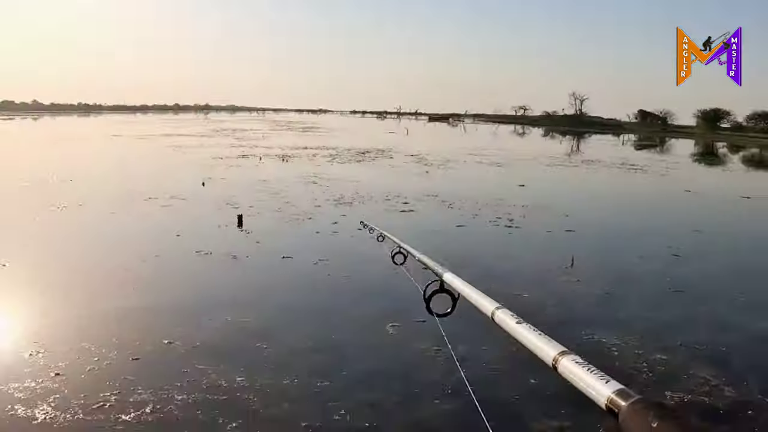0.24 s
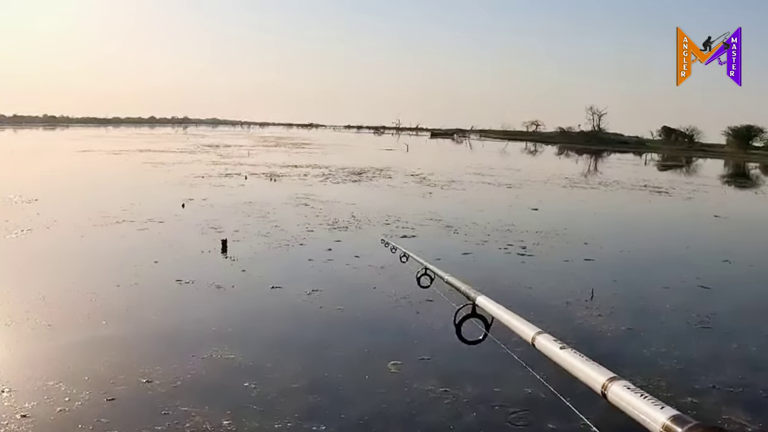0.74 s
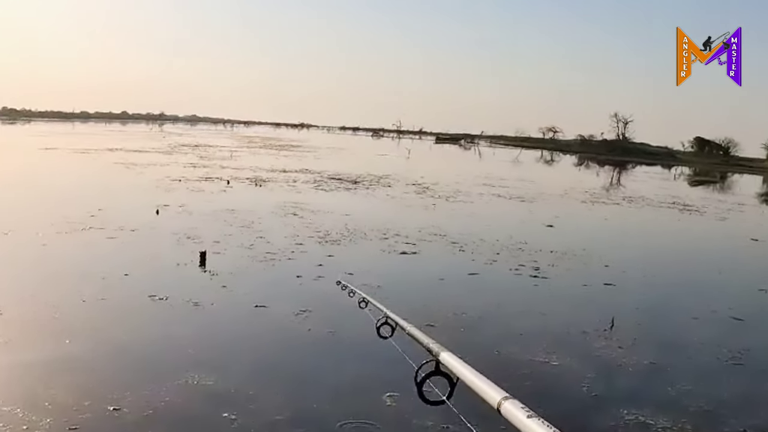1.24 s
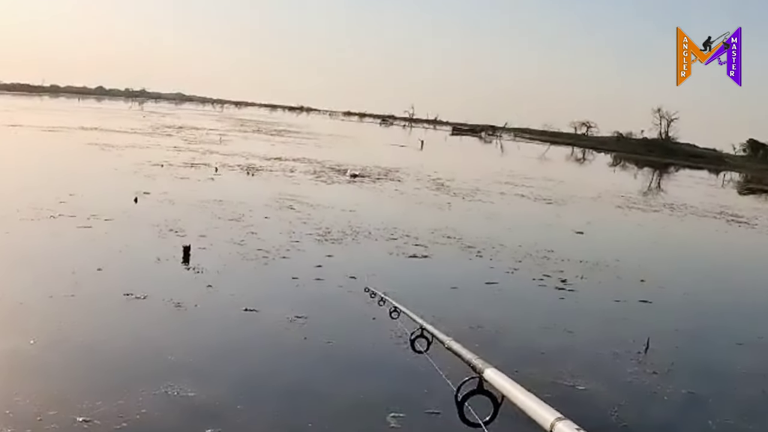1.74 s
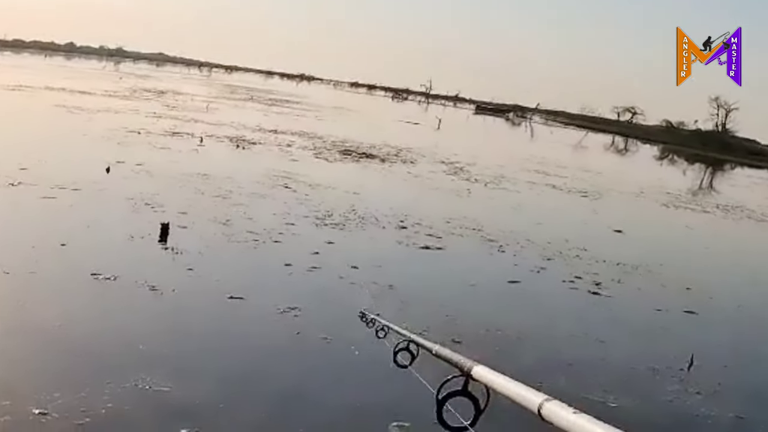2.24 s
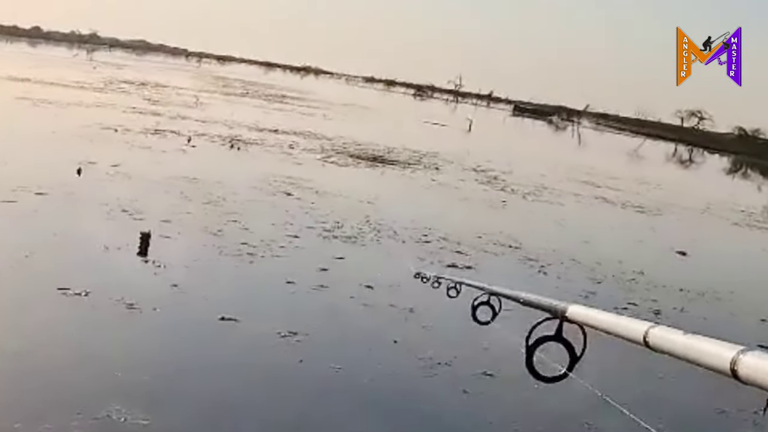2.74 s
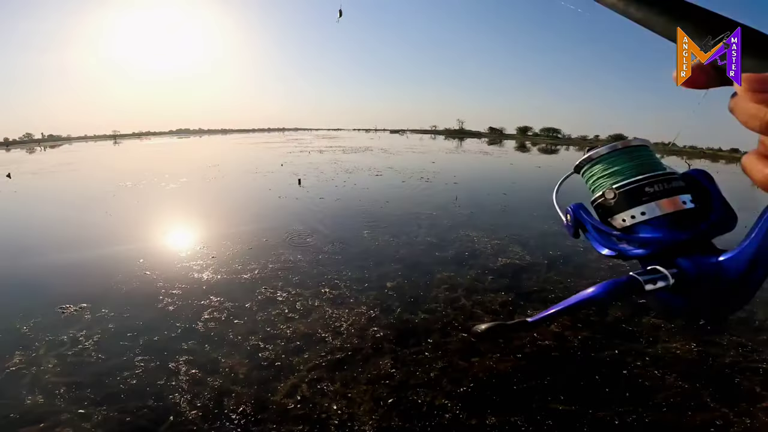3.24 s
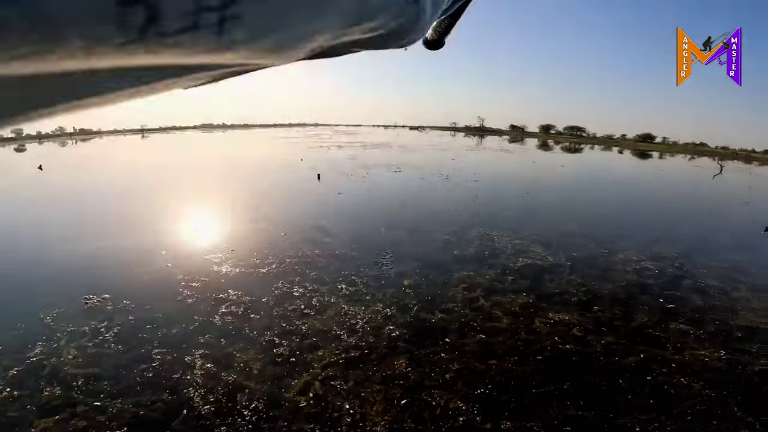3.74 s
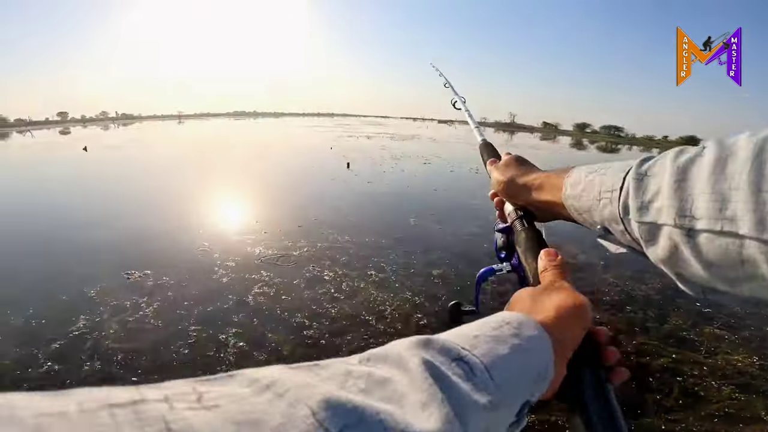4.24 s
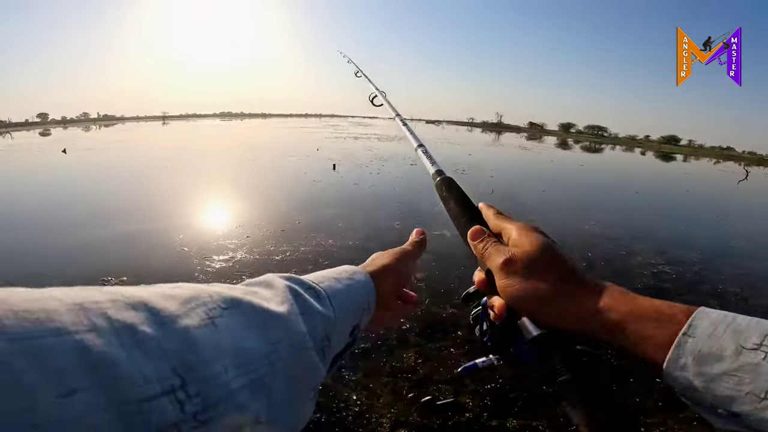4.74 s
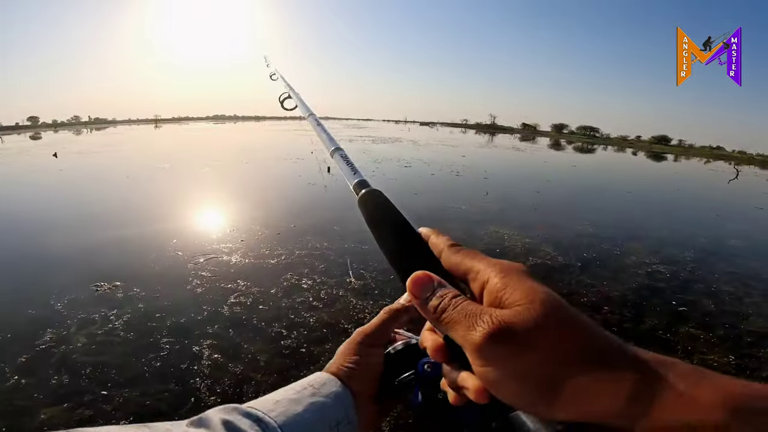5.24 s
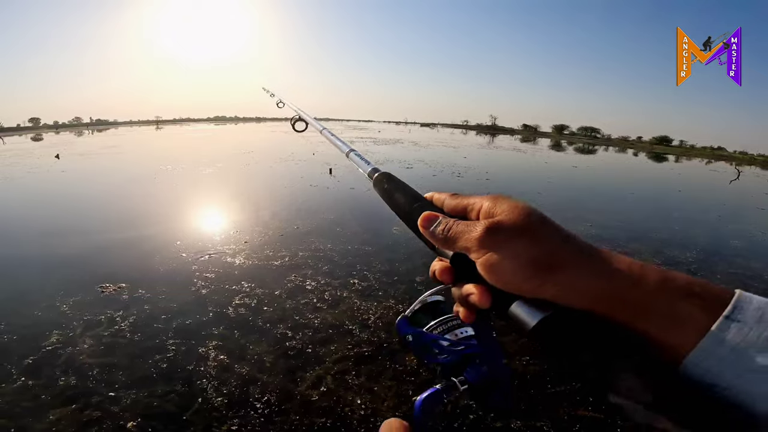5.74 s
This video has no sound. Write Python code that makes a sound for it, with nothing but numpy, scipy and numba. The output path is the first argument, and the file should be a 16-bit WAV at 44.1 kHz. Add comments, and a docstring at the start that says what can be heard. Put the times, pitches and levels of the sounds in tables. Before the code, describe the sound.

Quiet outdoor water's edge, everything dry and near. Dull, slowed winding with small knocks and ticks, a few bubbly plops and wind bumps. A crisp metal click, sleeve rustle and soft thuds prepare the cast. Then a sudden airy whirr of line with sharp guide ticks, fading to a thin hiss, ends in a dense burst of bright cracks and knocks, followed by isolated handling clicks.

```python
"""On a calm lake an angler winds a reel in: gear grains and ticks excite its body, over wind, air and birds.
From 0.3 to 3 s playback is slowed, so gear, reel, murmur and housing resonances lie lower.
The lure leaves the water in bending plops; the bail snaps open as short modes; soft knocks thump the chest mount.
The rod swings and casts: line coils slap the guides and hiss as filtered noise over the spool lip.
A hand stops the line in a burst of rubbing, knocks and ticks, and quieter handling follows."""
import sys
import numpy as np
from scipy import signal
from scipy.io import wavfile
from scipy.ndimage import uniform_filter1d
from numba import njit

SR = 44100
rng = np.random.default_rng(int(sys.argv[2]) if len(sys.argv) > 2 else 0)


def persist_wave(psi):
    """Save psi, clipped to +-1, as 16-bit WAV."""
    counts = np.round(np.clip(psi, -1, 1) * 32767).astype(np.int16)
    wavfile.write(sys.argv[1], SR, np.atleast_2d(counts).T)


N = 264688

SLOW_FROM_S, SLOW_TO_S, SLOW_SPEED = 0.3, 3.0, 0.699
TICK_T60_S, TICK_RISE_S, TICK_PAN_DB = 0.013, 0.00044, -3.5
MOUNT_LAG_S = 0.00048  # thumps and flutter travel through the mount and reach the left port later


def undb(db):
    """Amplitude ratio of a level in dB."""
    return 10 ** (np.asarray(db) / 20)


def unit(x):
    """Normalizes to a root-mean-square of 1."""
    return x / np.sqrt(np.mean(x ** 2))


def pan(left_minus_right_db):
    """Stereo gains by level difference, half of it on each side."""
    return undb(np.array([[left_minus_right_db], [-left_minus_right_db]]) / 2)


def curve(table, fade=0.044):
    """Linear interpolation of a table's columns at every sample, and a gate open while the table lasts."""
    s, *columns = np.transpose(table)
    t = np.arange(N) / SR
    gate = np.clip(np.minimum(t - s[0], s[-1] - t) / fade + .5, 0, 1)
    return [np.interp(t, s, c) for c in columns] + [gate]


def band(x, lo_hz, hi_hz, order=2):
    """Butterworth band-pass: flat between its edges."""
    return signal.sosfilt(signal.butter(order, [lo_hz, hi_hz], "bandpass", fs=SR, output="sos"), x)


def peak(x, hz, width):
    """Single resonance of a given bandwidth in Hz."""
    return signal.lfilter(*signal.iirpeak(hz, hz / width, fs=SR), x)


@njit
def svf(x, hz, width):
    """State-variable band-pass: a resonance with a moving centre, gain 1 there."""
    y, band_state, low_state = np.empty(len(x)), 0., 0.
    for i in range(len(x)):
        g, damping = np.tan(np.pi * hz[i] / SR), width / hz[i]
        v = (band_state + g * (x[i] - low_state)) / (1 + g * (g + damping))
        band_state = 2 * v - band_state
        low_state += 2 * g * v
        y[i] = damping * v
    return y


def walk(rate):
    """Slow random modulation: normal levels held 1 / rate s and smoothed twice."""
    hold = int(SR / rate)
    steps = np.repeat(rng.standard_normal(N // hold + 1), hold)
    return 1.113 * uniform_filter1d(uniform_filter1d(steps, hold), hold)[:N]


def pair(side):
    """Partly coherent noise at two microphone ports: a shared part and a share that is opposite."""
    mid, other = rng.standard_normal((2, N))
    return np.array([mid + side * other, mid - side * other])


def grit(rate, spread_db, length_s):
    """Stick-slip friction envelope: many small grains, a few large, each with a short energy tail."""
    sizes = undb(spread_db * np.minimum(rng.exponential(size=N), 4.5))
    spikes = (rng.random(N) < rate / SR) * sizes
    energy = signal.lfilter([1], [1, -np.exp(-1 / (length_s * SR))], spikes ** 2)
    return unit(np.sqrt(energy + 0.0012))


def speed_at(s):
    """Playback speed, which scales frequency in proportion."""
    return np.where((s > SLOW_FROM_S) & (s < SLOW_TO_S), SLOW_SPEED, 1.)


def ring(hz, t60, phase=0.):
    """Free decay of one mode: a sinusoid that falls 60 dB in t60 seconds."""
    t = np.arange(int((t60 + .01) * SR)) / SR
    return np.sin(2 * np.pi * hz * t + phase) * 1000 ** (-t / t60)


def rise(sound, rise_s):
    """Finite contact time: a linear onset."""
    return sound * np.minimum(np.arange(len(sound)) / (rise_s * SR), 1)


def mix(sounds):
    """Superposition of sounds of unequal length."""
    out = np.zeros(max(len(x) for x in sounds))
    for x in sounds:
        out[:len(x)] += x
    return out


def add(out, s, peak_db, sound, pan_db):
    """Superposes a short sound, scaled to its peak level before panning."""
    i = int(s * SR)
    sound = sound[:N - i] * undb(peak_db) / np.abs(sound).max()
    out[:, i:i + len(sound)] += sound * pan(pan_db)


def guide_ringing(flap, t):
    """Forced resonance: the flapping line excites guide modes whose pitch and level wander."""
    # rod guide modes before wandering: f/Hz, width/Hz, level/dB
    guide_modes = [(730, 17, -7), (934, 10, 0), (1150, 18, 6.5), (1990, 34, -4), (2510, 94, 2.5),
                   (2810, 99, 6), (3065, 47, 2), (3570, 74, 2.5), (3940, 34, -4), (4380, 39, -18)]
    total = 0
    for hz, width, db in guide_modes:
        gain = undb(db + 7 * walk(28))
        mode_hz = hz * 2 ** (.06 * walk(10))
        total = total + gain * np.array([svf(c, mode_hz, 1. * width) for c in flap])
    # the guides ring less as the line slows
    return 1.66 * np.exp(-(np.maximum(t - 4.33, 0) / 0.65) ** 2) * total


def cast():
    """Periodic excitation: coils flap on rod and guides, brush the spool lip and hum at the coil rate."""
    # line leaving the spool: t/s, rod thrum level/dB, reel body level/dB, low guide slap level/dB,
    # high guide slap level/dB, lip hiss level/dB, lip resonance f/Hz, top hiss level/dB
    line_course = [(4.11, -59, -61, -65, -69, -69, 7240, -73),
                   (4.15, -35.5, -46, -41.5, -44, -58, 7200, -64),
                   (4.2, -30, -42, -32, -30, -34.5, 7700, -46),
                   (4.25, -33, -47, -32, -31.5, -34.5, 6800, -45),
                   (4.29, -36, -36, -39, -38, -38, 6250, -49),
                   (4.36, -36, -41, -34.5, -37.5, -37, 6900, -41),
                   (4.42, -39, -45, -37, -40, -40.5, 7400, -41.5),
                   (4.49, -38.5, -50, -37.5, -36.5, -37.5, 8300, -44),
                   (4.54, -39.5, -54, -34.5, -34, -38.5, 8600, -48),
                   (4.59, -40.5, -50, -43.5, -42.5, -40, 8200, -46),
                   (4.74, -43, -44.5, -41, -39.5, -41.5, 7100, -60),
                   (4.78, -46, -52, -46, -44, -39.5, 7700, -55),
                   (4.86, -49.5, -51.5, -53, -43.5, -39, 8150, -57),
                   (4.9, -54, -46.5, -53, -45, -38.5, 7800, -60),
                   (5.03, -56, -43.5, -64, -46, -38, 7560, -58),
                   (5.1, -52, -48, -44, -47, -36.5, 6800, -55),
                   (5.23, -45.5, -42.5, -43, -39.5, -40, 5900, -49),
                   (5.3, -47, -53, -50, -40, -42, 6600, -42)]
    coil_from_s, coil_hz_start, coil_slowing_s = 4.33, 210, 0.81
    hum_db, hum_to_s, hum_fade_s = -41.5, 4.65, 0.048
    lip_focus = 2.1  # resonant share of the lip hiss
    rod_db, body_db, slap_db, high_db, lip_db, lip_hz, top_db, gate = curve(line_course)
    t = np.arange(N) / SR

    coil_hz = coil_hz_start * np.exp(-np.maximum(t - coil_from_s, 0) / coil_slowing_s)
    turn = 2 * np.pi * np.cumsum(coil_hz * (1 + 0.0299 * walk(40))) / SR
    outside_s = np.maximum(np.maximum(coil_from_s - t, t - hum_to_s), 0)
    hum = undb(hum_db) * np.exp(-outside_s / hum_fade_s)
    flap = grit(890, 1.7, 0.0046) * (1 + 0.1 * np.sin(turn)) * undb(2.0 * walk(45))

    rods = pair(0.37) * flap
    rods += guide_ringing(rods, t)
    low = unit(band(rods, 220, 1130)) * undb(rod_db)
    low += unit(peak(band(rods, 980, 1840), 1208, 97)) * undb(body_db)
    for lo_hz, hi_hz, db in [(2240, 2860, slap_db), (3140, 4900, high_db)]:
        low += unit(band(rods, lo_hz, hi_hz)) * undb(db + 1.66 * walk(22.02))
    low += np.sqrt(2) * hum * (np.sin(turn) + 0.41 * np.sin(2 * turn))
    low[0] = np.roll(low[0], 1)  # the reel is held to the right: it reaches the left port later

    brush = pair(0.22) * flap
    lip = band(brush, 4940, 9300) + lip_focus * np.array([svf(c, lip_hz, 2400.0) for c in brush])
    lip /= np.sqrt(uniform_filter1d(np.mean(lip ** 2, axis=0), int(.08 * SR)))  # even out over 80 ms
    lip *= undb(lip_db + 1.0 * walk(35))
    top = unit(band(pair(0.72) * flap, 10500, 13000)) * undb(top_db)
    return gate * (low * pan(-2.2) + lip + top * pan(2.8))


def bail():
    """Modal impact: the bail wire snaps on the rotor, bright short modes over a longer body ring."""
    # modes of the wire and reel body: f/Hz, level/dB, t60/s
    bail_modes = [(665, -14.5, .012), (1226, -6.5, 0.033), (1970, -3, 0.012), (2940, -2, 0.0095),
                  (3110, -5.5, 0.009), (4760, -4, 0.0081), (5900, -7, 0.0096), (6980, -3.5, 0.0083),
                  (7900, -11.5, 0.0073), (9620, -16.5, 0.0083), (11340, -19, 0.01)]
    out = np.zeros((2, N))
    snap = mix([undb(db) * ring(hz, t60) for hz, db, t60 in bail_modes])
    add(out, 3.0316, -2, -rise(snap, TICK_RISE_S), -1.2)
    return out


def faint_ticks(count):
    """Uniformly random moments: rows of t/s, peak level/dB, centre f/Hz, knock minus peak level/dB."""
    s, size, pitch = rng.random((count, 3)).T
    peak_db = -53 + 4.5 * size
    centre_hz = 1700 * 2 ** (1.4 * pitch ** 2)
    return list(zip(s * (N / SR - .05), peak_db, centre_hz, np.full(count, -13)))


def ticks():
    """Impulse excitation: a crack of noise, the reel modes near its centre and a knock of the body."""
    # single ticks and clacks of reel and rod, faint to loud:
    # t/s, peak level/dB, centre f/Hz, body knock minus peak level/dB
    tick_rows = [(0.0466, -36.5, 1650, -4), (0.0855, -34.5, 2300, -7), (0.1486, -45, 1670, 6.5),
                 (0.2548, -41, 1960, -3), (0.3925, -45.5, 6240, -1), (0.4953, -53, 1700, 0),
                 (0.5197, -42, 3030, -2), (0.5741, -36.5, 3900, -5), (0.615, -53, 2000, 8),
                 (0.754, -45.5, 5130, -7), (0.79, -49, 2300, -30), (0.906, -48, 6500, -30),
                 (0.9288, -38.5, 6410, -30), (0.942, -41, 1500, -12), (0.9687, -34.5, 2100, -11),
                 (1.214, -48, 5470, -30), (1.261, -40.5, 4200, -30), (1.452, -53, 7000, -30),
                 (1.492, -43, 3550, -20), (1.676, -42.5, 5270, -21), (1.732, -39, 2130, -25),
                 (1.7838, -41, 2620, -9), (1.8747, -35, 2670, -8), (1.953, -32, 1800, -6.5),
                 (1.9824, -23.5, 2140, -12), (2.075, -47, 4000, -30), (2.0895, -35, 2310, -18),
                 (2.0954, -27.5, 1760, -10), (2.137, -47, 4770, -30), (2.2543, -22, 2920, -17),
                 (2.2792, -32.5, 3500, -5), (2.3, -39, 4000, -30), (2.352, -36, 2300, -20),
                 (2.4338, -21, 2160, -20), (2.665, -38, 3600, -30), (2.6908, -30, 2170, -20),
                 (2.734, -39, 3580, -30), (2.746, -42, 1500, -2), (2.785, -49, 2800, -20),
                 (2.8207, -56, 4500, -13), (2.8591, -37, 2770, -25), (2.8792, -38.5, 4800, -31),
                 (2.891, -50, 6500, -31), (2.942, -50, 2870, -1), (3.0285, -33, 3000, 0),
                 (3.0335, -15, 3000, -30), (3.0375, -21.5, 4140, -21), (3.057, -40, 2800, -20),
                 (3.0691, -40, 3500, -20), (3.141, -43, 2060, -24), (3.189, -37, 6540, -30),
                 (3.2217, -32.5, 3200, -9), (3.253, -22, 1920, -12.5), (3.264, -43, 6500, -30),
                 (3.283, -47, 6500, -30), (3.5324, -31.5, 2010, -22), (3.5965, -33.5, 3500, 1),
                 (3.6122, -35.5, 6800, -2.5), (3.638, -38, 8500, -6), (3.6626, -38, 6500, -25),
                 (3.6715, -29, 4700, -11), (3.703, -26.5, 2680, -10), (3.717, -46, 4800, -25),
                 (3.7296, -21, 3830, -37), (3.756, -38, 3500, -25), (3.898, -56, 5500, -25),
                 (4.0458, -29, 2600, -10), (4.0465, -33.5, 5700, -30), (4.1769, -15, 3400, -9.5),
                 (4.187, -32, 6940, -25), (4.2078, -16.5, 3570, -21), (4.3121, -33, 2540, -22),
                 (4.4398, -20, 2960, -20), (4.471, -18, 2810, -31), (4.6182, -20, 3720, -33),
                 (4.8125, -26, 3600, -24), (5.089, -22, 6350, -12), (5.1522, -24.5, 4850, -21),
                 (5.3019, -16, 3100, -16), (5.3162, -15, 4200, -10), (5.3237, -9.5, 2670, -31),
                 (5.328, -8.5, 2900, -31), (5.3325, -23, 2600, -31), (5.344, -14, 3620, -31),
                 (5.3375, -15, 2940, -6), (5.3498, -10.5, 4040, -12), (5.356, -17, 2510, -20),
                 (5.361, -30, 2500, -25), (5.367, -23, 3000, -25), (5.384, -24, 3300, -28),
                 (5.3935, -7, 3900, -33), (5.3952, -7.5, 6400, -31), (5.406, -23, 3900, -25),
                 (5.415, -23, 2800, -30), (5.4311, -24, 3770, -14), (5.4745, -29, 4010, -5),
                 (5.4824, -25, 5930, -14), (5.503, -31, 4500, -30), (5.51, -29, 5200, -30),
                 (5.5027, -42, 1860, -15), (5.5443, -25, 1870, -4), (5.5522, -26.5, 2220, -0.5),
                 (5.559, -18.5, 3320, -2), (5.6112, -30.5, 3840, -3), (5.7425, -12.5, 3260, -38),
                 (5.752, -35, 1860, -32), (5.8139, -25, 2860, -22), (5.9803, -33.5, 3400, -15)]
    # reel modes at full speed: f/Hz, level/dB, longest t60/s; of the first, the body knock, only f is used
    reel_modes = [(1250, -15.5, 0.034), (1915, 9, 0.022), (3180, 9, 0.034), (4380, 22, 0.0037),
                  (4400, -2.5, 0.056), (6680, 17, 0.035), (9080, 19.5, 0.017)]
    out = np.zeros((2, N))
    rows = tick_rows + faint_ticks(count=45)
    chance = rng.random((len(rows), len(reel_modes)))
    for (s, db, hz, body_db), luck in zip(rows, chance):
        slow = speed_at(s)
        crack = band(rng.standard_normal(3000), hz / 1.6, min(hz * 1.6, 11000.), order=3)
        crack *= 1000 ** (-np.arange(3000) / SR / (0.63 * TICK_T60_S))
        rings = []
        for (f, level_db, t60), u in zip(reel_modes[1:], luck[1:]):
            mode = ring(f * slow * (1 + 0.1 * (u - .5)), min(t60, 1.1 * TICK_T60_S), 2 * np.pi * u)
            distance_octaves = np.log2(f * slow / hz)
            rings.append(undb(level_db - 33.0 * distance_octaves ** 2) * mode)
        modes = mix(rings)
        tick = mix([crack / np.abs(crack).max(), 0.73 * modes / np.abs(modes).max()])
        add(out, s - .0005, db, rise(tick, TICK_RISE_S), TICK_PAN_DB)
        knock_hz = reel_modes[0][0] * slow * (0.932 + 0.13 * luck[0])
        add(out, s + 0.0004, db + body_db, ring(knock_hz, 2.0 * TICK_T60_S), TICK_PAN_DB)
    return out


def knocks():
    """Damped two-mode vibration: short woody knocks of gears, reel body and, during the cast, rod guides."""
    # t/s, peak level/dB, lower mode f/Hz
    knock_rows = [(0.496, -41.5, 960), (0.52, -39, 1180), (0.533, -40, 970), (0.566, -37, 1310),
                  (0.584, -34.5, 1260), (0.609, -40.5, 1300), (0.616, -43, 1230), (0.944, -34.5, 897),
                  (1.095, -49, 1380), (1.167, -43, 970), (1.197, -42, 1470), (1.227, -48, 1460),
                  (1.251, -40.5, 1075), (1.261, -45, 1450), (1.275, -43, 1060), (1.295, -41.5, 1120),
                  (1.308, -43, 1260), (1.324, -40.5, 1070), (1.395, -45.5, 1410), (1.396, -44, 670),
                  (1.47, -48, 1240), (1.492, -47, 1140), (1.648, -38.5, 1140), (1.671, -47, 1040),
                  (1.692, -45, 1040), (1.71, -43, 1290), (1.761, -43.5, 970), (2.105, -42, 1450),
                  (2.375, -35.5, 1750), (2.975, -45.5, 1190), (2.993, -54, 1250), (3.038, -20.5, 1154),
                  (3.057, -32.5, 2000), (3.062, -34.5, 1185), (4.212, -25, 2020), (4.262, -24.5, 2410),
                  (4.345, -32, 2610), (4.365, -29, 1140), (4.52, -30, 2570), (4.665, -31, 2770),
                  (4.815, -35, 2370), (5.3, -32, 1210), (5.308, -24.5, 1130), (5.323, -20, 1010),
                  (5.334, -18.5, 960), (5.344, -24, 1150), (5.35, -21, 930), (5.357, -21, 1110),
                  (5.366, -21, 1150), (5.395, -26, 920), (5.403, -26, 955), (5.413, -25, 980),
                  (5.433, -32, 990), (5.446, -29, 980), (5.462, -32, 1040), (5.476, -37, 1270),
                  (5.51, -35, 1280), (5.514, -34, 1880), (5.556, -26, 1217)]
    rise_s, t60_s = 0.0012, 0.03
    out = np.zeros((2, N))
    for s, db, hz in knock_rows:
        knock = mix([ring(hz, t60_s), 0.45 * ring(1.28 * hz, 0.88 * t60_s)])
        add(out, s - .001, db, rise(knock, rise_s), TICK_PAN_DB)
    return out


def rub_gains():
    """Power addition: gains of body, scratch and sizzle from steady rub plus bursts that sag and let go."""
    # steady rubbing of gears, hands and sleeves: t/s, body level/dB, scratch level/dB, sizzle level/dB
    steady_rub = [(0.0, -52, -57.5, -64), (0.33, -58, -64, -62.5), (0.37, -58.5, -63.5, -73),
                  (1.3, -57, -62, -76.5), (1.4, -59, -67.5, -79), (1.93, -60.5, -64.5, -75),
                  (2.05, -48.5, -54, -85), (2.2, -49, -56.5, -82), (2.38, -51.5, -51, -76),
                  (2.5, -53.5, -53, -74), (2.76, -55, -59, -67), (2.87, -63.5, -61.5, -82),
                  (3.1, -61.5, -61, -66.5), (3.41, -63, -63, -70), (3.7, -50, -49, -51.5),
                  (3.93, -56, -56.5, -61.5), (4.13, -54.5, -56.5, -62), (5.5, -59.5, -48, -58),
                  (5.7, -52, -61, -65.5), (6.0, -74, -62, -69)]
    # bursts (handle strokes, lure lifted, bail and hand on the spool):
    # t/s, length/s, body level/dB, scratch level/dB, sizzle level/dB
    rub_bursts = [(0.035, 0.13, -50, -69, -74), (0.239, 0.06, -50, -74, -72), (0.49, 0.13, -52, -54.5, -61),
                  (0.937, 0.016, -49, -54, -77), (1.197, 0.11, -57, -60.5, -84),
                  (1.662, 0.27, -55.5, -64.5, -72), (1.953, 0.058, -46, -40, -76),
                  (2.091, 0.017, -40, -71, -80), (2.197, 0.14, -43.5, -56, -65),
                  (2.326, 0.043, -45, -52, -82), (2.443, 0.011, -48, -51, -72),
                  (3.042, 0.03, -45, -50, -65), (5.294, 0.013, -33, -30, -33),
                  (5.321, 0.042, -27, -28, -29.5), (5.375, 0.075, -33.5, -33.5, -39.5),
                  (5.468, 0.07, -43.5, -42.5, -43), (5.551, 0.0042, -36, -32, -35),
                  (5.604, 0.015, -61, -42, -47.5), (5.743, 0.0078, -32.5, -28, -34),
                  (5.813, 0.0083, -53, -43, -66), (5.978, 0.0054, -40, -47.5, -56)]
    attack_s, sag_db_per_s, release_db_per_s = 0.01, 59, 854  # the release adds to the sag
    t = np.arange(N) / SR
    power = undb(curve(steady_rub)[:-1]) ** 2
    for s, length, *db in rub_bursts:
        fall_db = sag_db_per_s * (t - s) + release_db_per_s * np.maximum(t - s - length, 0)
        shape = np.clip((t - s) / attack_s + .5, 0, 1) * undb(-np.maximum(fall_db, 0))
        power = power + np.outer(undb(db), shape) ** 2
    return np.sqrt(power)


def rubbing():
    """Stick-slip friction: coarse grains knock the reel body; finer ones, partly their own, scratch and sizzle."""
    winding_to_s, gear_hz, grip_hz = 3.0, 1630, 823  # knocks ring higher while the handle turns
    coarse, fine = grit(450, 3.15, 0.0076), grit(1500, 1.0, 0.001)
    t = np.arange(N) / SR
    centre_hz = np.where(t < winding_to_s, gear_hz * speed_at(t), grip_hz)
    # a new random pitch every 512 samples
    detune = np.repeat(np.clip(rng.standard_normal(N // 512 + 1), -2, 2), 512)[:N]
    knock_hz = centre_hz * 2 ** (0.3 * detune)

    body = []
    for grains in pair(0.52) * coarse:
        broad = svf(svf(grains, centre_hz, 1730.0), centre_hz, 1700.0)
        body.append(broad + svf(grains, knock_hz, 230.0))
    body = signal.sosfilt(signal.butter(4, 1750, fs=SR, output="sos"), np.array(body))
    body = unit(body + 1.16 * band(pair(0.17), 270, 510))
    scratch = unit(band(pair(0.54) * (fine + 0.58 * coarse), 1200, 4760)) * undb(2.0 * walk(40))
    sizzle = unit(band(pair(0.76) * fine, 3050, 12100)) * undb(1.9 * walk(16))
    return sum(layer * gain for layer, gain in zip((body, scratch, sizzle), rub_gains()))


def thumps():
    """Soft-contact impact: a smooth push drives one dull mode through the chest mount."""
    # t/s, peak level/dB, f/Hz, t60/s
    thump_rows = [(0.88, -40, 107, 0.085), (1.2, -33.5, 131, 0.071), (1.23, -34.5, 121, 0.086),
                  (1.263, -34.5, 139, 0.076), (1.396, -36.5, 130, 0.093), (1.584, -44, 311, 0.088),
                  (1.981, -26, 243, 0.018), (2.103, -33.5, 135, 0.062), (2.16, -46, 181, 0.052),
                  (2.201, -37, 174, 0.038), (2.281, -22.5, 194, 0.049), (2.286, -29, 77, 0.22),
                  (3.031, -31.5, 196, 0.057), (3.497, -29, 254, 0.05), (3.618, -33, 189, 0.029),
                  (3.645, -34, 169, 0.046), (3.72, -30, 234, 0.092), (3.76, -27.5, 200, 0.036),
                  (3.772, -26.5, 232, 0.041), (3.82, -25.5, 266, 0.041), (3.866, -23.5, 270, 0.066),
                  (3.895, -25.5, 256, 0.038), (3.934, -22, 251, 0.05), (4.123, -19.5, 259, 0.051),
                  (4.174, -21, 174, 0.053), (4.466, -19, 202, 0.066), (4.663, -28.5, 285, 0.095),
                  (4.705, -32, 199, 0.037), (5.206, -25.5, 174, 0.1), (5.325, -26, 44.7, 0.66),
                  (5.327, -20, 412, 0.11), (5.337, -21.5, 392, 0.037), (5.346, -33, 232, 0.07),
                  (5.362, -35, 183, 0.062), (5.402, -38, 154, 0.095), (5.656, -35, 176, 0.095),
                  (5.742, -28, 424, 0.086)]
    push = np.hanning(int(0.0037 * SR))
    out = np.zeros((2, N))
    for s, db, hz, t60 in thump_rows:
        add(out, s - .003, db, signal.fftconvolve(ring(hz, t60), push), -4.5)
    out[0] = np.roll(out[0], int(MOUNT_LAG_S * SR))
    return out


def plops():
    """Cavity resonance with gliding pitch: hollow plops as the lure is lifted from the water."""
    # t/s, peak level/dB, starting f/Hz, t60/s
    plop_rows = [(2.096, -30.5, 728, 0.052), (2.12, -25.5, 640, 0.059), (2.163, -37, 760, 0.05),
                 (2.187, -32, 693, 0.064), (2.217, -29.5, 857, 0.096), (2.258, -31, 854, 0.03),
                 (2.28, -26, 517, 0.044), (2.343, -34, 1473, 0.049)]
    rise_s, half_bend = 0.0051, -0.09  # the pitch bends by twice this share within t60
    out = np.zeros((2, N))
    for s, db, hz, t60 in plop_rows:
        age = np.arange(int((t60 + .01) * SR)) / SR
        bend = 2 * np.pi * hz * half_bend * age ** 2 / t60
        plop = ring(hz, t60, bend)
        plop += 0.51 * ring(1.17 * hz, t60, -bend)  # this partial bends the other way
        plop += 0.18 * ring(1.6 * hz, t60, bend)
        add(out, s - .002, db, plop * np.minimum(age / rise_s, 1) ** 2, -1.5)
    return out


def chinks():
    """Inharmonic modal ringing: small metal parts of the lure chink, one close pair of modes beating."""
    # t/s, peak level/dB
    chink_rows = [(3.13, -83), (3.188, -36)]
    # modes of the metal parts: f/Hz, level/dB, t60/s
    metal_modes = [(3467, -8, .42), (5035, 0, .85), (5041.3, -5, .85), (8107, -1, .25), (12030, -8, .09)]
    out = np.zeros((2, N))
    for s, db in chink_rows:
        chink = mix([undb(level_db) * ring(hz, t60) for hz, level_db, t60 in metal_modes])
        add(out, s - .004, db, rise(chink, .012), 0.1)
    return out


def wind():
    """Turbulent noise: slow gusty rumble, and faster flutter whose upper part is less coherent between ports."""
    # wind and body sway on the camera: t/s, rumble level/dB, flutter level/dB
    wind_course = [(0.0, -44, -46.5), (0.23, -58.5, -52), (0.53, -34, -56.5), (0.67, -57.5, -52.5),
                   (1.12, -42, -53.5), (1.22, -53, -50), (1.5, -39.5, -44.5), (1.65, -43, -54),
                   (2.14, -46, -49.5), (2.24, -17, -40), (2.3, -24.5, -39.5), (2.62, -29.5, -48.5),
                   (2.72, -44, -53), (3.31, -32.5, -48), (3.41, -44.5, -52), (3.55, -44, -41.5),
                   (3.68, -33.5, -42.5), (3.8, -36.5, -44.5), (3.92, -35, -40.5), (4.06, -26, -39.5),
                   (4.15, -25, -37.5), (4.33, -26.5, -38.5), (4.5, -41, -40.5), (4.8, -37, -43),
                   (5.08, -42, -45.5), (5.15, -23.5, -45), (5.28, -52, -47.5), (5.35, -43, -35.5),
                   (5.6, -35.5, -42), (5.7, -32.5, -45), (5.83, -31.5, -44), (6.0, -64, -48)]
    wind_pan_db, flutter_pan_db = -3, -1.5  # left minus right; the upper flutter's pan adds to the wind's
    low_db, flutter_db, _ = curve(wind_course)
    rumble = unit(band(pair(0.39), 4.5, 19.1)) * undb(low_db + 1.8 * walk(8.8))
    flutter = band(pair(0.57), 82, 227.7) * pan(flutter_pan_db)
    flutter += 1.52 * band(pair(0.14), 37.6, 79.0)
    flutter = unit(flutter) * undb(flutter_db + 4.8 * walk(30))
    flutter[0] = np.roll(flutter[0], int(MOUNT_LAG_S * SR))
    return (rumble + flutter) * pan(wind_pan_db)


def birds():
    """Frequency modulation: far whistles that glide, mostly downward, with slightly unsteady levels."""
    # one list per call: t/s, f/Hz, level/dB
    bird_calls = [
        [(1.35, 2670, -72), (1.43, 2470, -69), (1.46, 2280, -72), (1.5, 2050, -67), (1.525, 1950, -62),
         (1.55, 1650, -66), (1.562, 1450, -72)],
        [(1.716, 3860, -64), (1.727, 3711, -59), (1.757, 3100, -60), (1.77, 2990, -61), (1.79, 2930, -65)],
        [(2.57, 4120, -66), (2.59, 3990, -63), (2.66, 3800, -64), (2.68, 3700, -72)],
        [(3.135, 4020, -70), (3.155, 3960, -64), (3.18, 3800, -70)],
        [(3.305, 4150, -70), (3.33, 4450, -68), (3.365, 4820, -70)],
    ]
    out = 0
    for call in bird_calls:
        hz, db, gate = curve(call, fade=0.016)
        whistle = np.sqrt(2) * np.sin(2 * np.pi * np.cumsum(hz) / SR)
        out = out + gate * undb(db + 1.3 * walk(58.6)) * whistle
    return out


def air():
    """Filtered broadband noise: faint hiss of open water and far shore, with a narrow resonant murmur."""
    # murmur: t/s, level/dB
    murmur_course = [(0, -60), (.3, -61), (.37, -60), (.45, -58), (.65, -61), (.75, -59), (1.1, -62.5),
                     (1.3, -64.5), (2.0, -71), (2.6, -62), (3.0, -69.5), (3.5, -70), (5.6, -61), (6.0, -63)]
    hiss = band(pair(0.38), 460, 1400, order=1)
    murmur_hz = 1195 * speed_at(np.arange(N) / SR) * 2 ** (0.05 * walk(12))
    murmur = np.array([svf(svf(c, murmur_hz, 150.0), murmur_hz, 150.0) for c in hiss])
    murmur_db = curve(murmur_course)[0] + 2.6 * walk(9)
    return unit(hiss) * undb(-73.5) + unit(murmur) * undb(murmur_db)


def scene():
    """Linear superposition of all sources."""
    reel = cast() + bail() + ticks() + knocks() + rubbing()
    return reel + thumps() + plops() + chinks() + wind() + birds() + air()


def housing(x, speed):
    """Resonant transmission: peaks, notches and falling top of the camera housing scale with playback speed."""
    # at full speed: f/Hz, width/Hz, share added (a minus is a notch)
    housing_modes = [(1200, 8.5, -0.11), (1800, 41, 0.28), (2050, 63, 0.34), (10490, 1110, -0.75),
                     (12340, 4000, -0.29)]
    for hz, width, share in housing_modes:
        x = x + share * peak(x, hz * speed, width * speed)
    return signal.sosfilt(signal.butter(6, 13000 * speed, fs=SR, output="sos"), x)


def record(dry):
    """Filtering and saturation: housing colour at either playback speed, rounded peaks and a cut top."""
    slow = uniform_filter1d(1. * (speed_at(np.arange(N) / SR) < 1), int(0.015 * SR))
    wet = slow * housing(dry, SLOW_SPEED) + (1 - slow) * housing(dry, 1.0)
    rounded = .9 * np.tanh(wet / .9)
    return signal.sosfilt(signal.ellip(10, .2, 80, 15600, fs=SR, output="sos"), rounded)


dry = scene()
out = record(dry)
persist_wave(out)
```